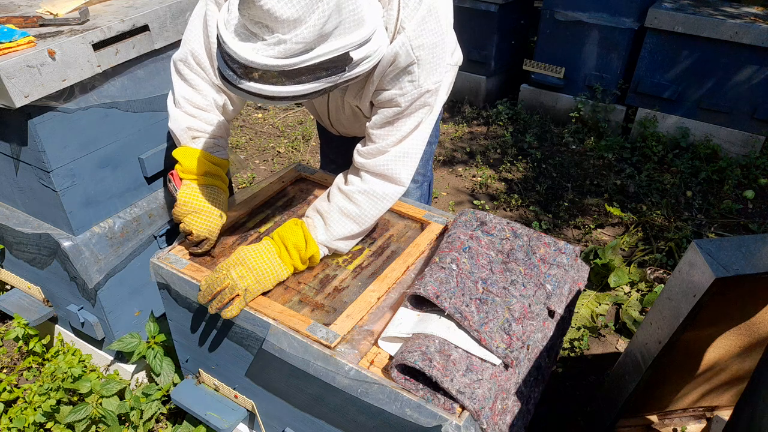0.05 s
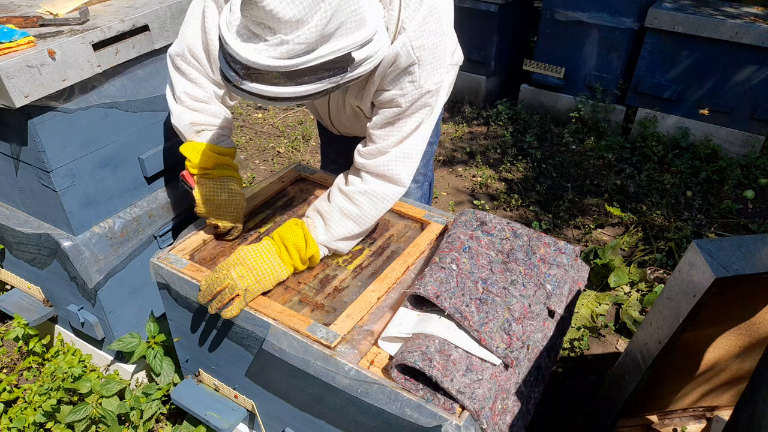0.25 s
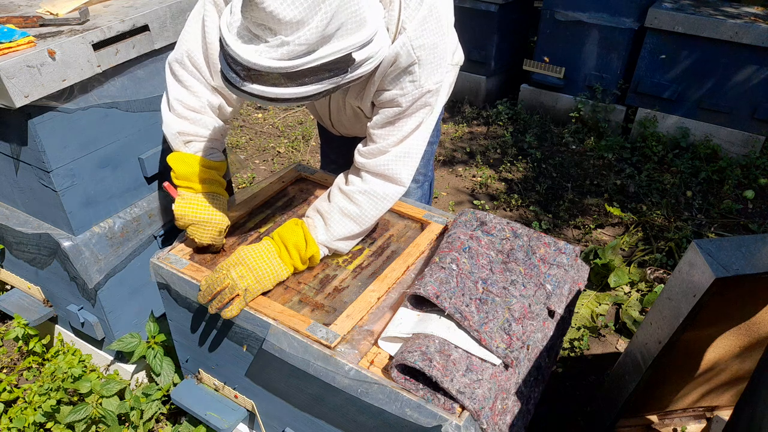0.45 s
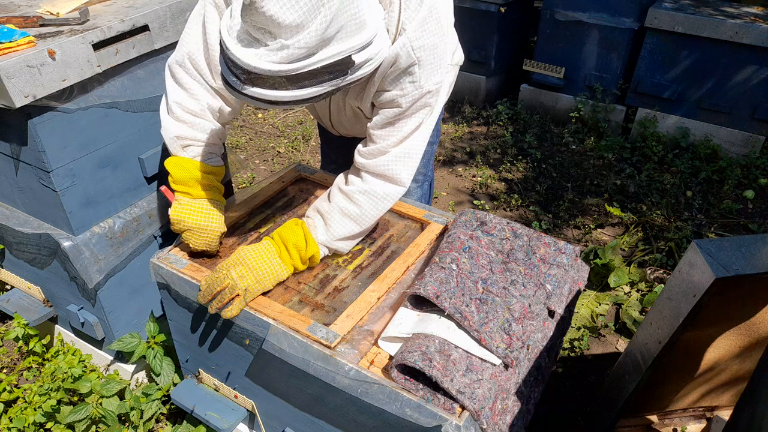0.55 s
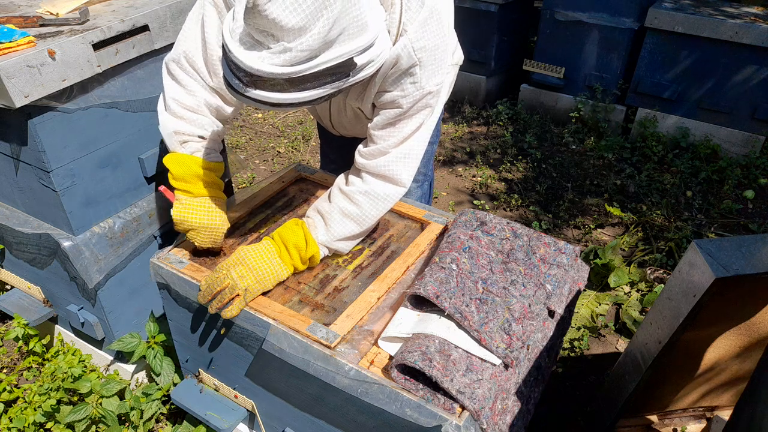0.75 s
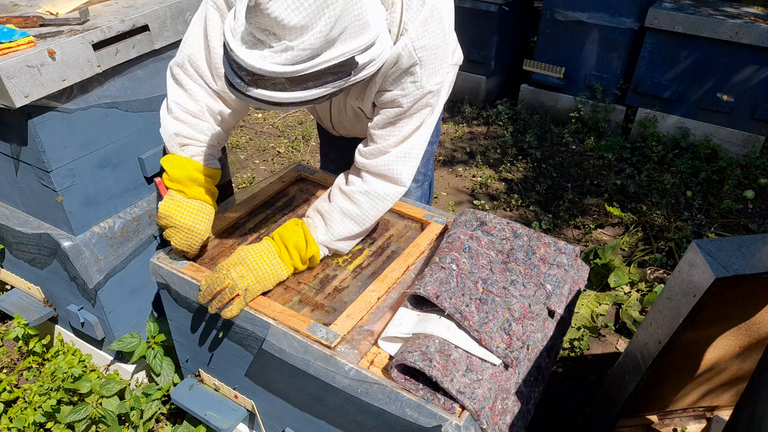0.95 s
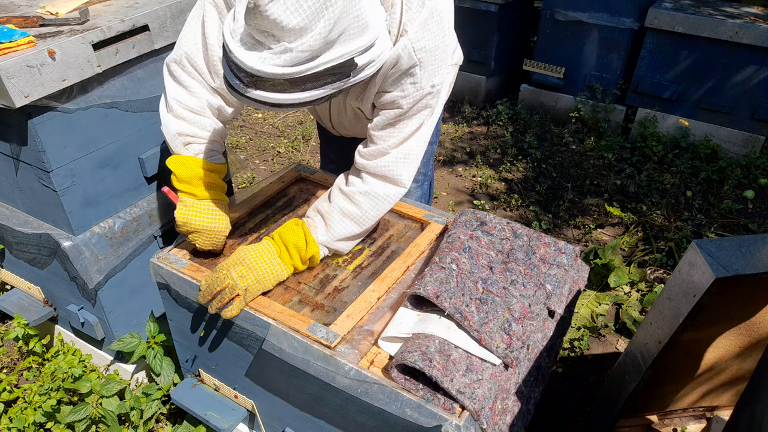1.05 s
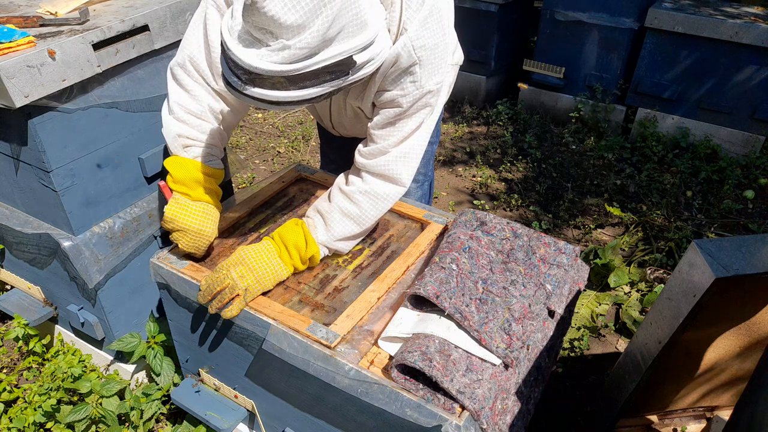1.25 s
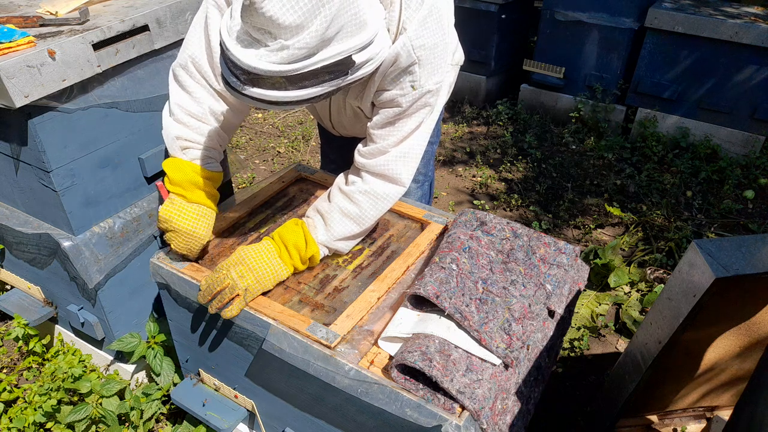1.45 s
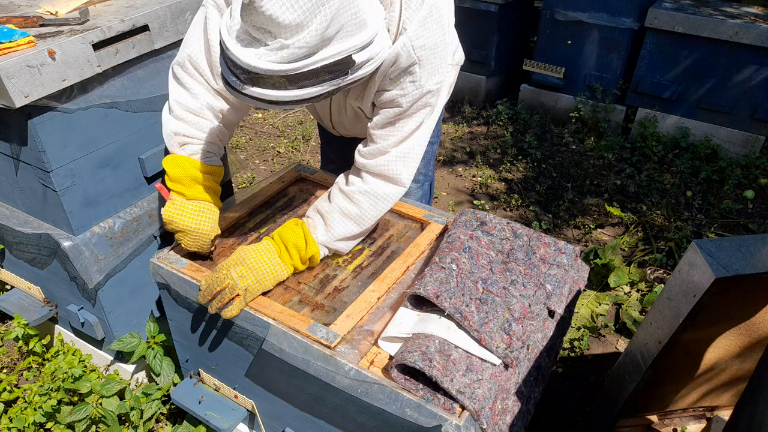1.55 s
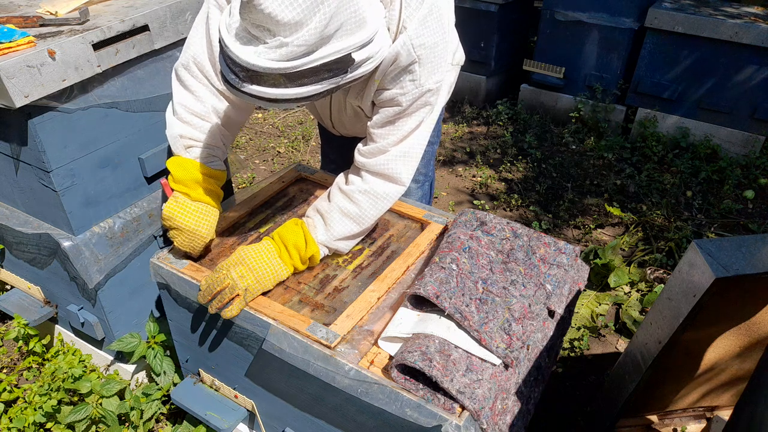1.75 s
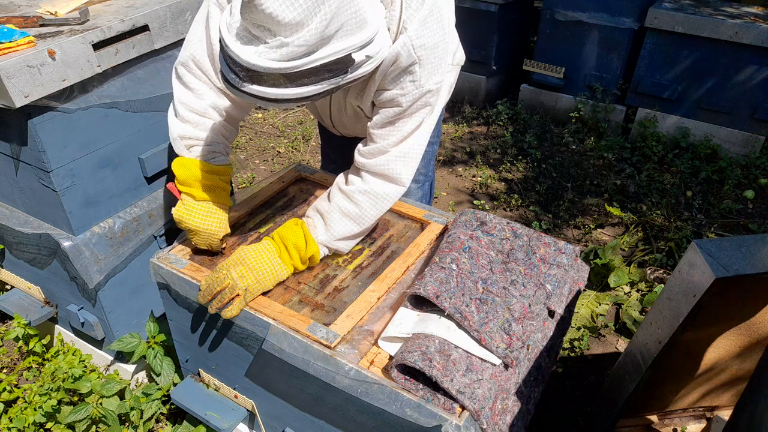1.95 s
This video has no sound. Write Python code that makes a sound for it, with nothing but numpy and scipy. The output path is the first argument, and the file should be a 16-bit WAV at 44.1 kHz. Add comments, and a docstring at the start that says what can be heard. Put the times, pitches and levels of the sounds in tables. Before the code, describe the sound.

A metal tool scrapes wooden beehive frames in short, crunchy pushes outdoors.

```python
"""At an open beehive, a steel hive tool scrapes wax and propolis off the wooden frames in short pushes.
The blade sticks and slips, catches, rings and twice squeaks; the crust crumbles, and the frame
and box ring dully under it. The ground and neighbouring hives scatter a short tail.
Behind lie a low outdoor murmur of air and faint far birds."""
import sys
import numpy as np
from scipy import signal
from scipy.fft import rfft, irfft
from scipy.io import wavfile
from scipy.ndimage import uniform_filter1d

SR = 44100
rng = np.random.default_rng(int(sys.argv[2]) if len(sys.argv) > 2 else 0)


def master(y):
    """Save y as 16-bit WAV."""
    cut = np.clip(np.atleast_2d(y).T, -1, 1)
    pcm = np.round(cut * 32767)  # scale
    wavfile.write(sys.argv[1], SR, pcm.astype(np.int16))


N = 2 * SR


def from_db(db):
    """Decibels to gain."""
    return 10 ** (np.asarray(db) / 20)


def unit_rms(x):
    """Scale to unit power."""
    return x / np.sqrt(np.mean(x ** 2) + 1e-20)


def at_hz(points, hz):
    """Read a table on a log-frequency axis."""
    table_hz, value = np.transpose(points)
    return np.interp(np.log(hz + 1e-3), np.log(table_hz), value)


def colour(x, gain):
    """Filter by a gain that depends on frequency."""
    return irfft(rfft(x) * gain(np.fft.rfftfreq(N, 1 / SR)), N)


def equalise(x, spectrum):
    """Filter by a table of Hz and dB."""
    return colour(x, lambda hz: from_db(at_hz(spectrum, hz)))


def tilted(x, db_per_octave):
    """Tilt the spectrum about 700 Hz; flat above 2 kHz."""
    return colour(x, lambda hz: from_db(db_per_octave * np.log2((np.minimum(hz, 2000) + 200) / 900)))


def two_ears(draws, coherence):
    """Mix one shared and two separate signals into a stereo pair."""
    share = lambda hz: np.clip(at_hz(coherence, hz), 0, 1)
    common = colour(draws[0], lambda hz: np.sqrt(share(hz)))
    return common + colour(draws[1:], lambda hz: np.sqrt(1 - share(hz)))


def resonate(x, hz, width_hz):
    """One resonance, unit peak gain."""
    r = np.exp(-np.pi * width_hz / SR)
    feedback = [1, -2 * r * np.cos(2 * np.pi * hz / SR), r * r]
    return signal.lfilter(np.array([1, 0, -1]) * (1 - r * r) / 2, feedback, x + 1e-18)


def band(x, hz, width_hz):
    """Two equal resonances in series; unit power."""
    return unit_rms(resonate(resonate(x, hz, width_hz), hz, width_hz))


def bursts(times_s, levels_db, decay_s):
    """A force that jumps at each time and dies away."""
    jumps = np.bincount(np.clip(times_s * SR, 0, N).astype(int), from_db(levels_db), N + 1)[:N]
    return signal.lfilter([1], [1, -np.exp(-1 / (decay_s * SR))], jumps + 1e-18)


def swell(start_s, rise_s, hold_s, fall_s):
    """Trapezoid envelope."""
    return np.interp(np.arange(N) / SR, start_s + np.cumsum([0, rise_s, hold_s, fall_s]), [0, 1, 1, 0])


def whistles(rows, width_hz):
    """Unsteady tones of narrow-band noise that swell and fade."""
    noise = rng.standard_normal((2, N))
    return sum(from_db(db) * swell(start_s, length_s / 2, 0, length_s / 2) * band(noise, hz, width_hz)
               for start_s, length_s, hz, db in rows)


# Each row: start, rise, hold and fall in seconds, crust, frame and thud levels in dB,
# thud lag in seconds, crust and frame tilts in dB per octave.
PUSHES = [ (-.03, 0.0061, 0.022, 0.051, -50.5, -58.5, -68, 0.017, 1, -9.5),
          (0.168, .004, 0.0056, 0.015, -56.5, -58.5, -73, 0.028, -2.5, 6.5),
          (0.187, 0.0046, 0.026, 0.0062, -45.5, -50, -55, 0.0018, 1.5, 3.5),
          (0.227, 0.011, 0.038, 0.028, -33.5, -37.5, -49.5, 0.022, 0, 6),
          (.606, .018, 0.024, 0.017, -48.5, -50, -50, 0.0032, -3, 7),
          (0.883, 0.031, 0.018, 0.024, -40.5, -39.5, -51.5, .002, 0.5, -2.5),
          (1.169, 0.019, .028, 0.043, -38.5, -44, -49.5, 0.0059, 0, -6.5),
          (1.437, 0.017, 0.025, 0.028, -42, -46.5, -53, 0.0017, 0, -0.5),
          (1.72, 0.039, 0.015, 0.032, -44.5, -44.5, -53, 0.018, 0.7, -1)]
# Each row: frequency in Hz, gain of the box's thud in dB.
BOX_SPECTRUM = [(25, -20), (55, -2), (85, -10.5), (125, 3.5), (170, 0), (250, -7.5), (350, 2.5),
                (480, -2.5), (700, -13), (1500, -42)]


def scraping():
    """Each push crumbles the crust, shakes the frame and thuds in the box."""
    slips, fractures, crust = stick_slip(), grains(), crumbling()
    box = unit_rms(equalise(grains(), BOX_SPECTRUM))
    sound = force = 0
    for start_s, rise_s, hold_s, fall_s, *settings in PUSHES:
        crust_db, frame_db, thud_db, lag_s, crust_tilt, frame_tilt = settings
        push = swell(start_s, rise_s, hold_s, fall_s) * slips
        crumbs = unit_rms(colour(crust, lambda hz: from_db(crust_tilt * np.log2(1 + hz / 500))))
        thud = box * swell(start_s + lag_s, rise_s, hold_s, 2 * fall_s)
        sound = sound + from_db(crust_db) * push * crumbs + from_db(thud_db) * thud
        force = force + from_db(frame_db) * push * tilted(fractures, frame_tilt)
    return sound + frame(force)


def stick_slip(slips_per_s=150, jitter=0.3, spread_db=4, drag=1):
    """The blade slips unevenly on top of a steady drag; unit power."""
    gaps, sizes = rng.standard_normal((2, 600))
    times_s = np.cumsum(np.exp(jitter * gaps)) / slips_per_s
    slips = bursts(times_s, spread_db * sizes, decay_s=0.0021)
    return unit_rms(drag + unit_rms(slips))


# Each row: frequency in Hz, left-right coherence from 0 to 1.
GRAIN_COHERENCE = [(100, 0.89), (900, 1), (2500, 0.81), (4500, 0.42), (7000, 0.01), (11000, 0),
                   (16000, 0.4)]


def grains(grains_per_s=18000, spread_db=1.5):
    """Dense tiny fractures in stereo; unit power."""
    shape = (3, N)
    sizes = from_db(spread_db * np.minimum(rng.exponential(1, shape), 4))
    signs = rng.choice([-1, 1], shape)
    breaks = rng.random(shape) < grains_per_s / SR
    return unit_rms(two_ears(sizes * signs * breaks, GRAIN_COHERENCE))


# Each row: frequency in Hz, gain in dB.
CRUST_SPECTRUM = [(60, -51), (250, -7.5), (700, 3), (1100, 0), (2100, 0.5), (2600, 2), (3100, 2.5),
                  (4500, 0), (6000, -1), (7100, -0.5), (8100, -14), (9500, -11.5), (12500, -9),
                  (14500, -11.5), (16000, -28)]
# Each row: frequency in Hz, width in Hz, gain relative to the crust in dB.
BLADE_MODES = [(3042, 41, -9), (3440, 48, -5), (4440, 25, 4.5), (4820, 26, -4), (5540, 93, -9.5),
               (6840, 27, 2), (7220, 24, -16.5)]


def crumbling():
    """Breaking wax and propolis ring the glove-damped steel blade; unit power."""
    crust = equalise(grains(), CRUST_SPECTRUM)
    ringing = sum(from_db(db) * resonate(crust, hz, width_hz) for hz, width_hz, db in BLADE_MODES)
    return unit_rms(crust + ringing)


# Each row: frequency in Hz, width in Hz, relative gain in dB.
FRAME_MODES = [(235.3, 36, -7), (347, 60, -12.5), (449, 44, -2), (587, 43, -1), (640, 46, -6),
               (724, 42, -6), (810, 76, -9), (976, 70, -4), (1065, 60, -6.5), (1289, 57, -4.5),
               (1584, 68, -8), (1867, 76, -13)]


def frame(force):
    """The hand-damped wooden frame rings; a white force roughly keeps its power."""
    power = sum(from_db(db) ** 2 * np.pi * width_hz / SR for _, width_hz, db in FRAME_MODES)
    ringing = sum((-1) ** k * from_db(db) * resonate(force, hz, width_hz)
                  for k, (hz, width_hz, db) in enumerate(FRAME_MODES))
    return ringing / np.sqrt(power)


# Each row: start in seconds, crack, snap and knock levels in dB.
BLADE_CATCHES = [(0.173, -59, -75, -48), (0.192, -50, -58, -49), (0.2294, -32.5, -39.5, -39),
                 (0.238, -26.5, -36, -38.5), (0.246, -33, -34, -40), (.256, -28, -32, -54),
                 (0.268, -29.5, -36, -42), (0.276, -31, -36, -39), (0.292, -43, -53, -32),
                 (0.6002, -40, -63, -58), (0.6089, -36.5, -45.5, -39), (0.621, -38, -50, -57),
                 (0.6296, -37, -45, -34.5), (0.641, -40, -50, -64), (.896, -44, -61, -42.5),
                 (.909, -46, -41.5, -43), (0.917, -31.5, -50, -36), (0.928, -33, -43, -37.5),
                 (0.947, -48.5, -54, -43.5), (1.175, -39, -64, -59), (1.1835, -44, -35.5, -45),
                 (1.194, -38, -41.5, -51), (1.198, -35, -46, -50), (1.2105, -31.5, -46, -36),
                 (1.234, -67, -58, -33.5), (1.2545, -47, -52, -49), (1.276, -53, -67, -46),
                 (1.441, -40, -54, -60), (1.4497, -44.5, -54, -31), (1.731, -41, -51, -43),
                 (1.744, -38.5, -54, -38), (1.7708, -34.5, -44, -42), (1.786, -65, -70, -40.5),
                 (1.799, -36.5, -67, -42)]


def catches(crack_decay_s=0.0054, knock_decay_s=0.0039):
    """Each catch of the blade cracks the crust, snaps off a flake and knocks the frame."""
    times_s, crack_db, snap_db, knock_db = np.transpose(BLADE_CATCHES)
    cracks = crumbling() * bursts(times_s, crack_db, crack_decay_s)
    snaps = band(grains(), hz=12160, width_hz=6200) * bursts(times_s, snap_db, crack_decay_s)
    force = tilted(grains(), db_per_octave=-3) * bursts(times_s, knock_db, knock_decay_s)
    return cracks + snaps + frame(force)


# Each row: start in seconds, level in dB.
BOX_THUMPS = [(.289, -51), (.922, -57), (1.24, -56.5)]


def thumps():
    """The box settles with a low shudder as the blade comes free."""
    times_s, db = np.transpose(BOX_THUMPS)
    shudder = band(rng.standard_normal(N), hz=81, width_hz=73)
    return shudder * uniform_filter1d(bursts(times_s, db, decay_s=0.031), size=400)


# Each row: start and length in seconds, pitch in Hz, level in dB.
EDGE_SQUEAKS = [(.193, 0.025, 5260, -43.5), (1.226, 0.028, 5380, -45.5)]


def squeaks():
    """The steel edge squeaks as it skids."""
    return whistles(EDGE_SQUEAKS, width_hz=700)


# Each row: frequency in Hz, left minus right level in dB.
BLADE_BALANCE = [(100, -1), (400, 0.5), (1300, 1), (2800, 2), (4400, 1.5), (5800, 5), (7200, 9.5),
                 (8500, 7), (11000, 1.5), (15000, 7)]


def from_the_left(x, right_lag_s=0.00017):
    """The blade is nearer the left ear: earlier there, and brighter."""
    half_db = lambda hz: at_hz(BLADE_BALANCE, hz) / 2
    left = colour(x[0], lambda hz: from_db(half_db(hz)))
    right = colour(x[1], lambda hz: from_db(-half_db(hz)) * np.exp(-2j * np.pi * hz * right_lag_s))
    return np.array([left, right])


# Each row: frequency in Hz, relative gain in dB.
ECHO_SPECTRUM = [(100, -7), (500, -12), (1000, -5.5), (2000, 0.5), (6000, -1), (9000, 1.5), (15000, 1)]


def scatter(x, t60_s, delay_s, db):
    """A diffuse spray of reflections that dies away."""
    t = np.arange(N) / SR
    noise = equalise(rng.standard_normal((2, N)), ECHO_SPECTRUM)
    echoes = noise * from_db(-60 * t / t60_s) * (t > delay_s)
    return from_db(db) * signal.fftconvolve(x, unit_rms(echoes) / np.sqrt(N), axes=1)[:, :N]


# Each row: frequency in Hz, relative gain in dB.
AIR_SPECTRUM = [(15, 1), (25, -20.5), (108, -5), (236, -6.5), (277, -7), (354, -0.5), (545, -10),
                (887, -14), (1070, -15.5), (2220, -25), (3080, -29), (4370, -26.5), (5880, -26),
                (7920, -36.5), (13600, -28.5), (16000, -29.5)]
# Each row: frequency in Hz, left-right coherence from 0 to 1.
AIR_COHERENCE = [(60, 0.08), (130, 0.88), (300, 0.75), (640, 0.35), (1400, 0.08), (15000, 0)]


def air(level_db=-57.5, waver_db=0.4, waver_hz=12):
    """Low outdoor murmur, wavering a little."""
    murmur = equalise(two_ears(rng.standard_normal((3, N)), AIR_COHERENCE), AIR_SPECTRUM)
    waver = unit_rms(colour(rng.standard_normal(N), lambda hz: 1 / (1 + (hz / waver_hz) ** 2)))
    return from_db(level_db - waver_db * waver) * unit_rms(murmur)


# Each row: start and length in seconds, pitch in Hz, level in dB.
BIRD_CHIRPS = [(.42, 0.11, 4500, -74), (.805, 0.079, 5800, -70.5), (0.847, .05, 4350, -71),
               (1.678, 0.08, 5220, -67)]


def birds():
    """Thin chirps from far off."""
    return whistles(BIRD_CHIRPS, width_hz=260)


def scene():
    """The tool at work, its reflections from ground and hives, air and birds."""
    blade = scraping() + catches() + thumps() + squeaks()
    ground = scatter(blade, t60_s=0.14, delay_s=0.0035, db=-10.5)
    hives = scatter(blade, t60_s=0.25, delay_s=0.012, db=-16.5)
    return from_the_left(blade) + ground + hives + air() + birds()


def record(dry):
    """High-pass at 36 Hz, steep low-pass at 16 kHz."""
    dry = signal.sosfilt(signal.butter(3, 36, "high", fs=SR, output="sos"), dry)
    return signal.sosfilt(signal.ellip(12, .1, 80, 16000, fs=SR, output="sos"), dry)


dry = scene()
out = record(dry)
master(out)
```